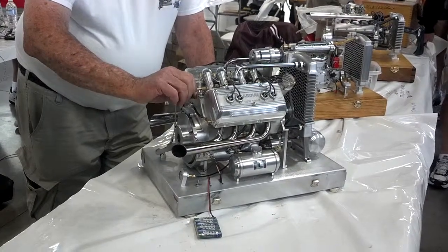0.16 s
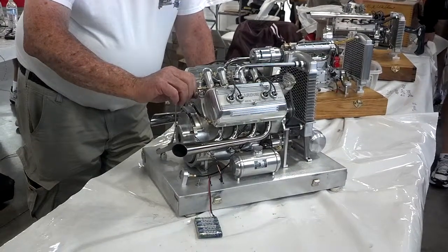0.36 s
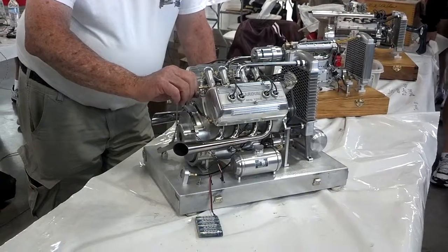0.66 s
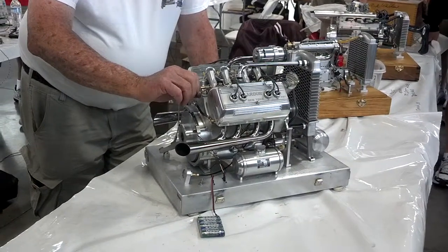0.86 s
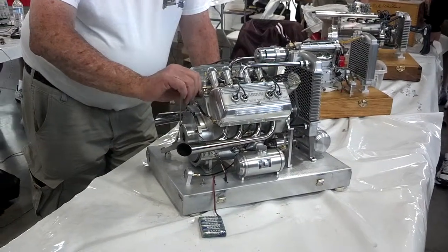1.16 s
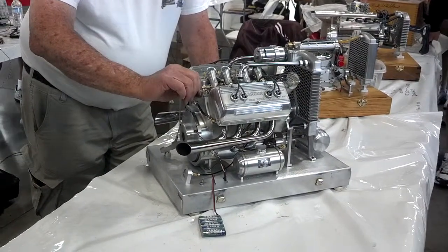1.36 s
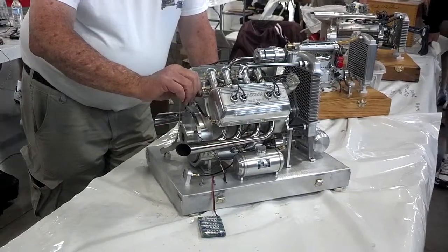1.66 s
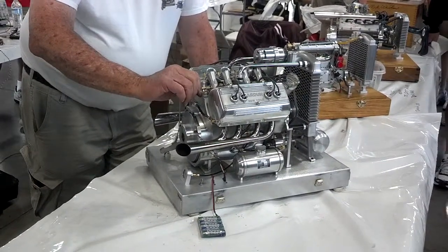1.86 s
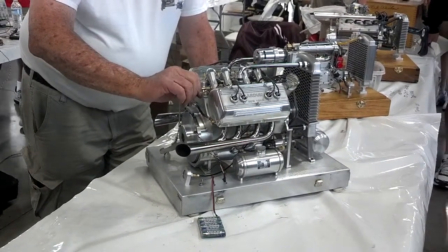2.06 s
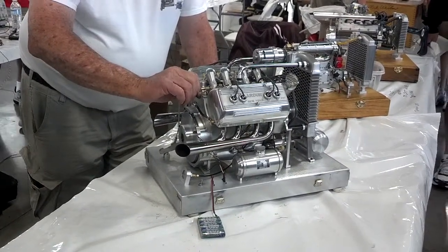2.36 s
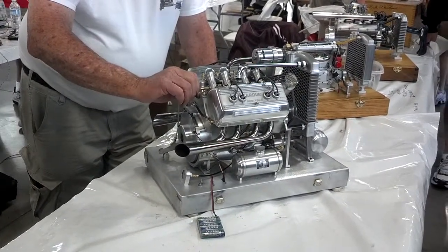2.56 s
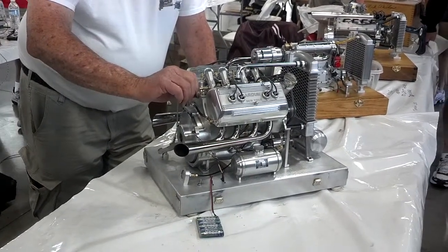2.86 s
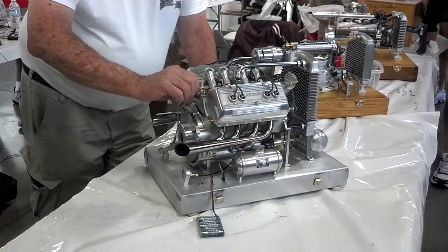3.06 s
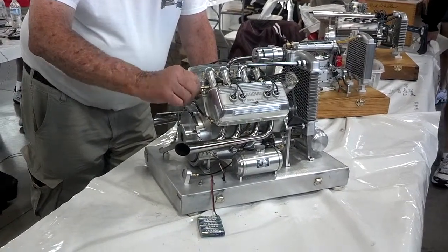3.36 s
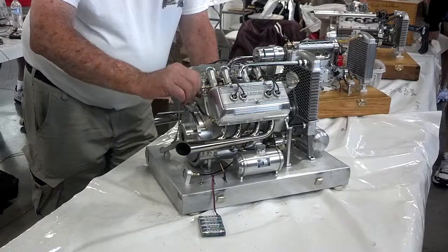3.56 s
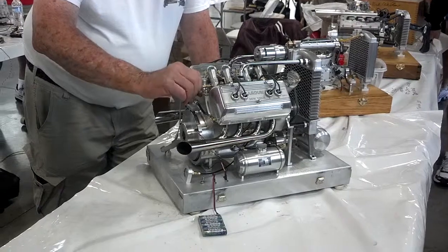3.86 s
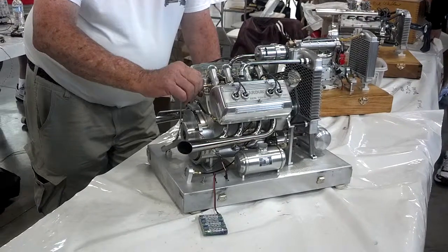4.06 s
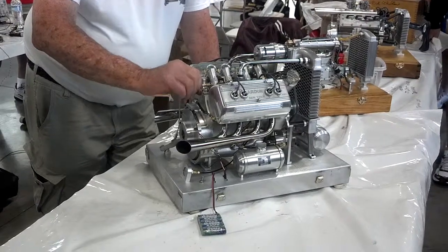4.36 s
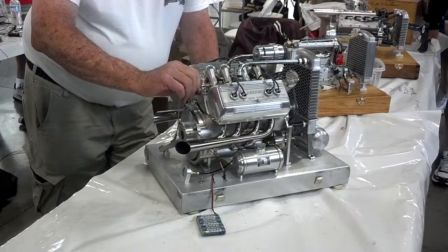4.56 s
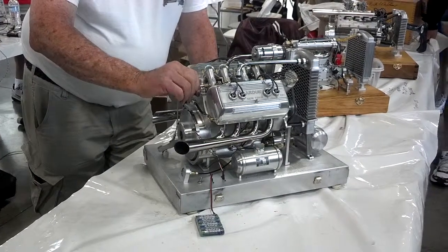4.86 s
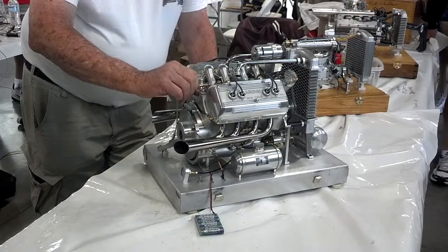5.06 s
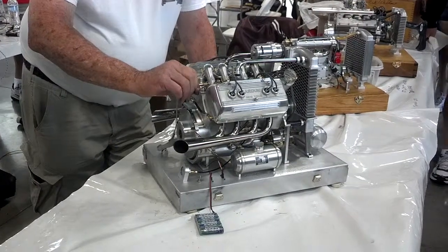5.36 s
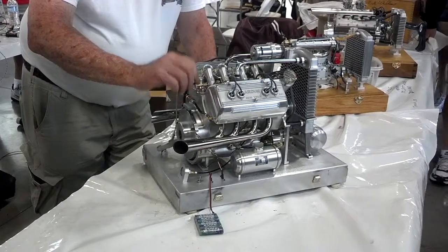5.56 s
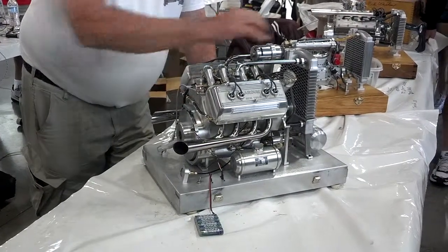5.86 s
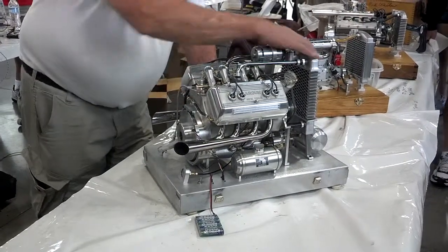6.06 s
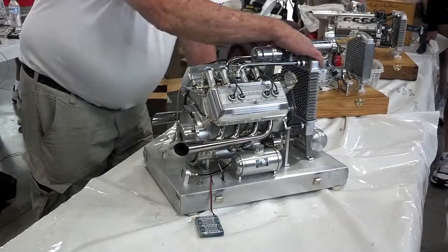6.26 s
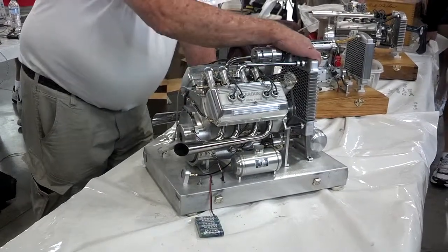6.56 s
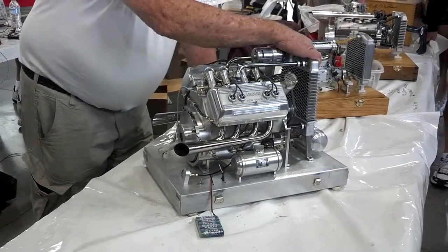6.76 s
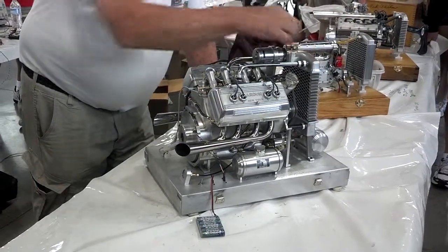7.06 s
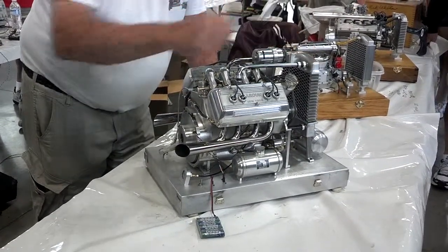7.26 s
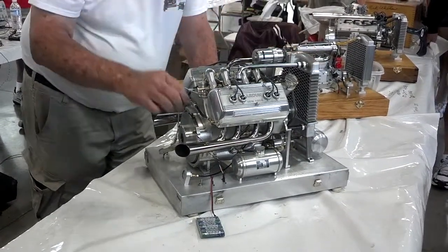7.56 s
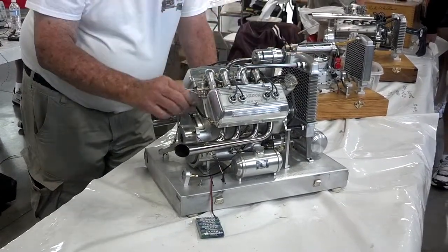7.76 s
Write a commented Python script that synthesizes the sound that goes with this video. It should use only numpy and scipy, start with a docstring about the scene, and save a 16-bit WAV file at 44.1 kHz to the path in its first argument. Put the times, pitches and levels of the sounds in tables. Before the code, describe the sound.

A miniature eight-cylinder engine idles roughly with sharp exhaust pops and is revved in several short blips in a hall.

```python
"""A miniature eight-cylinder engine idles lumpily on a table in a hall and is revved in short blips.
Each firing sends a pressure pulse into the exhaust pipes, which resonate with a thump, and releases a
turbulent jet whose crack sets the metal headers ticking. At speed the firings also sound as a drone.
Valve gear and fan whirr underneath, and the hall reverberates. The sound is wide and hollow in
stereo, the right channel inverted and a little late."""
import sys
import numpy as np
from scipy import signal
from scipy.fft import rfft, irfft, next_fast_len
from scipy.io import wavfile

SR = 44100
rng = np.random.default_rng(int(sys.argv[2]) if len(sys.argv) > 2 else 0)


def master_out(mix):
    """Clip the mix to full scale and print it as 16-bit PCM to the path in sys.argv[1]."""
    frames = np.transpose(np.atleast_2d(mix))
    ceiling = np.clip(frames, -1, 1)
    pcm = np.round(ceiling * 32767).astype(np.int16)
    wavfile.write(sys.argv[1], SR, pcm)


N = 349272


def engine(first_cylinder_s=6.976):
    """Superposition: the sources that one crankshaft drives add, in a sum and a difference view."""
    time = np.arange(N) / SR
    rate, opened, rasp_db, thump_db, crack_db = throttle(time)
    stumble_db = stumbles(time)
    phase = np.cumsum(rate) / SR   # one cycle per firing of one bank
    phase = phase - phase[int(first_cylinder_s * SR)]
    thump, crack = firings(phase, rate, opened, thump_db, crack_db, stumble_db)
    running = exhaust_drone(phase, rate, opened, stumble_db) + gear_whirr(rate)
    exhaust = pipe_resonance(blowdown(thump), rasp_db)
    return exhaust + running + jet_cracks(crack) + header_ticks(crack) + gas_puffs(crack)


def throttle(time, sink_per_s=550, shut_s=.0057, charge_lead=2.08):
    """Inertia: the charge follows the throttle quickly, the speed (one bank's firing rate) lags."""
    # speed the engine sinks back to: (time [s], firing rate of one bank [1/s])
    idle_speed = [(.8, 86), (1.4, 78), (1.75, 84), (2.5, 104), (5.9, 104), (6.08, 110.3), (6.5, 110.3),
                  (6.8, 109.3), (7.15, 107.8), (7.92, 107.9)]
    # throttle blips: (opens [s], reaches top speed [s], shuts [s], top rate of one bank [1/s],
    # thump level [dB], crack level [dB], starved afterwards [s])
    blips = [(-.5, -.1, .6, 128, -22.5, -21, .35), (1.72, 2.2, 2.41, 138, -26, -22, 0.093),
             (2.56, 2.943, 3.265, 217, -20.5, -19, 0.036), (3.32, 3.72, 4.06, 217.5, -21.5, -19.5, 0.4),
             (4.401, 4.731, 4.85, 188, -22, -18.5, 0.13)]
    idle_thump_db, idle_crack_db, idle_rasp_db, open_rasp_db = -29.5, -31.5, 1, 7.5
    thump_sag_db_per_s, rasp_sag_db_per_s = 1.5, 3
    idle = np.interp(time, *np.transpose(idle_speed))
    rate, opened, starved = idle, 0, 0
    rasp_db, thump_db, crack_db = idle_rasp_db, idle_thump_db, idle_crack_db
    for opens, full, shuts, top, top_thump_db, top_crack_db, starved_s in blips:
        rise, shut = ramp(time, opens, full), ramp(time, shuts, shuts + shut_s)
        rate = np.maximum(rate, idle + rise * (top - idle) - sink_per_s * np.maximum(time - shuts, 0))
        charge = np.minimum(charge_lead * rise, 1) * (1 - shut)
        held_s = np.maximum(time - max(full, 0), 0)
        opened += charge
        starved += shut * (1 - ramp(time, shuts, shuts + starved_s) ** 3)
        rasp_db += charge * (open_rasp_db - idle_rasp_db - rasp_sag_db_per_s * held_s)
        thump_db += charge * (top_thump_db - idle_thump_db - thump_sag_db_per_s * held_s)
        crack_db += charge * (top_crack_db - idle_crack_db)
    # starved firings thump 1 dB more and crack 6 dB less
    return rate, opened, rasp_db, thump_db + starved, crack_db - 6 * starved


def stumbles(time):
    """Partial misfire: under throttle the mixture stumbles and a few firings lose level, in dB."""
    # weak spells: (time [s], duration [s], loss [dB])
    spells = [(0.111, 0.022, 11), (0.229, 0.02, 12), (0.295, 0.018, 14), (0.419, 0.02, 10),
              (0.547, 0.02, 11.5), (1.864, 0.026, 5.5), (1.945, 0.018, 4), (2.04, 0.012, 6),
              (2.212, 0.018, 11), (2.291, 0.025, 18), (2.599, 0.0087, 12), (2.686, .025, 12),
              (2.741, 0.011, 19), (2.792, 0.0092, 13), (2.886, 0.0099, 13), (2.943, 0.017, 6.5),
              (3.141, 0.012, 12), (3.469, 0.026, 6), (3.51, 0.013, 12), (3.558, 0.012, 7.5),
              (4.553, 0.015, 10.5), (4.602, 0.018, 21), (4.653, 0.011, 17), (4.698, 0.012, 19),
              (4.744, 0.013, 6), (4.796, 0.012, 13)]
    return sum(db * (ramp(time, start - .003, start) - ramp(time, start + span - .002, start + span))
               for start, span, db in spells)


def firings(phase, rate, opened, thump_db, crack_db, stumble_db):
    """Cyclic variation: uneven combustion scatters the thump and crack impulses in level and time."""
    # habitual strength of each cylinder, in firing order: (level [dB])
    cylinder_db = [4.5, -4.5, -10, -0.5, -1.5, -3, -1, -8.5]
    # hard firings: (time [s], crack level [dB], thump level before the full-charge limit [dB])
    pops = [(0.055, -18, -15), (0.165, -19, -12), (0.2728, -11.5, -11.5), (0.3161, -14.5, -11),
            (0.3755, -15, -15), (0.439, -14, -9.5), (0.47, -18, -12), (0.49, -22, -12.5),
            (0.595, -21, -13.5), (0.751, -13.5, -22.5), (0.8624, -18, -19.5), (0.8975, -14.5, -22),
            (0.9238, -29, -16.5), (0.9447, -20, -21), (0.9741, -15.5, -17), (1.0108, -11.5, -32),
            (1.036, -13.5, -23.5), (1.094, -16.5, -19), (1.1282, -17, -19.5), (1.1499, -16, -24),
            (1.1786, -19, -20), (1.2051, -16, -15.5), (1.238, -12.5, -19), (1.321, -13.5, -17),
            (1.3314, -14.5, -21.5), (1.3709, -17.5, -22), (1.4019, -12, -23), (1.475, -18, -17),
            (1.508, -11.5, -10), (1.525, -14.5, -17.5), (1.548, -21, -15), (1.5765, -16, -21),
            (1.6078, -15, -9), (1.625, -16, -13), (1.6754, -15.5, -19.5), (1.707, -12, -10),
            (1.738, -12.5, -17), (1.8149, -13.5, -13.5), (1.8894, -15, -11), (1.98, -11, -17),
            (2.0783, -17, -12), (2.1482, -17, -9), (2.2365, -14, -11), (2.3262, -37, -15.5),
            (2.3839, -15, -12), (2.4818, -14, -15.5), (2.5259, -30, -21.5), (2.5578, -14.5, -18),
            (2.6238, -14, -15), (2.7036, -15, -11), (3.158, -29, -12), (3.2441, -17, -14.5),
            (3.317, -25, -16), (3.3587, -15, -17.5), (3.3949, -13, -11), (3.4268, -13.5, -12),
            (3.448, -15, -20), (3.491, -11.5, -18), (3.5434, -14, -23), (3.8228, -26, -11),
            (4.2892, -18, -18), (4.3241, -11.5, -19.5), (4.342, -14.5, -19.5), (4.3873, -17, -17),
            (4.3977, -14.5, -18), (4.427, -17, -19.5), (4.454, -13, -26), (4.5107, -11.5, -21),
            (4.6244, -11.5, -15), (4.685, -14, -13), (4.8179, -28, -13), (5.032, -16, -17.5),
            (5.0965, -14, -14), (5.11, -13.5, -12), (5.137, -23, -28), (5.1851, -13.5, -15),
            (5.2094, -15, -16), (5.2644, -13.5, -11.5), (5.2757, -17.5, -21.5), (5.327, -13, -15.5),
            (5.3416, -14, -19), (5.421, -13.5, -16.5), (5.43, -17, -28), (5.4582, -12, -14),
            (5.4807, -15.5, -18), (5.5336, -13, -13.5), (5.5845, -13.5, -12.5), (5.598, -17, -23),
            (5.6114, -16.5, -13), (5.685, -15, -11), (5.7253, -14, -11), (5.733, -15, -26),
            (5.7481, -14, -23), (5.76, -14.5, -10), (5.817, -22, -17), (5.8371, -12.5, -14),
            (5.8862, -14, -26), (5.9009, -13, -18), (5.9146, -16, -14), (5.934, -18, -25),
            (5.9956, -11, -20), (6.004, -18, -26), (6.018, -16, -11), (6.0309, -11, -12), (6.074, -16, -19),
            (6.1024, -14.5, -13.5), (6.1476, -19.5, -29), (6.1616, -10.5, -12.5), (6.174, -16, -13),
            (6.22, -19, -25), (6.2472, -18, -18), (6.2694, -13, -13), (6.3197, -18.5, -16),
            (6.369, -17, -17.5), (6.382, -12, -16), (6.396, -19, -17), (6.467, -13.5, -18.5),
            (6.475, -13, -20), (6.485, -15, -19), (6.501, -17.5, -15), (6.5762, -18, -14),
            (6.584, -13, -28), (6.61, -16, -13.5), (6.6701, -11.5, -11), (6.685, -16, -17),
            (6.692, -17, -22), (6.701, -16, -18), (6.7576, -15.5, -9), (6.778, -11.5, -21),
            (6.802, -17, -17), (6.83, -18.5, -17.5), (6.8713, -34, -34), (6.8902, -13, -14.5),
            (6.921, -14, -17), (6.9757, -13, -11), (7.023, -17.5, -16), (7.0373, -9.5, -12),
            (7.1246, -13, -17), (7.1462, -16, -16), (7.159, -9, -13), (7.1966, -18, -15), (7.259, -21, -34),
            (7.274, -15, -9), (7.2841, -15.5, -27), (7.309, -12.5, -16), (7.3485, -14.5, -15),
            (7.3884, -18, -13.5), (7.397, -15.5, -21.5), (7.413, -13.5, -12), (7.424, -15.5, -19),
            (7.496, -10, -13), (7.505, -16, -23), (7.519, -18, -16), (7.532, -17, -10), (7.567, -15.5, -16),
            (7.629, -15.5, -16), (7.643, -15.5, -14), (7.6903, -15, -13), (7.718, -14.5, -7),
            (7.7389, -14.5, -17), (7.7911, -14, -10), (7.8386, -13, -18), (7.853, -13, -17),
            (7.867, -20, -20), (7.884, -16.5, -14)]
    pop_s, pop_crack_db, pop_thump_db = np.transpose(pops)
    catch_db, catch_s, full_charge_db = 11.5, .0084, -14
    climbing_delay_s, open_delay_s, idle_delay_s = .0007, .0003, .0012   # spread of the burning delay
    count = np.floor(2 * phase).astype(int)   # the two banks take turns
    at = np.flatnonzero(np.diff(count)) + 1
    cylinder = count[at] % len(cylinder_db)
    strength_luck, crack_luck, delay_luck = np.clip(rng.standard_normal((4000, 3))[:len(at)], -2.5, 1.2).T
    uneven_db = np.maximum(4.5 - 3 * np.log2(rate[at] / 100), 0)   # steadier at speed
    strength_db = np.array(cylinder_db)[cylinder] - stumble_db[at] + uneven_db * strength_luck
    # at a fast idle a hard firing drags the next ones along
    since_pop_s = at / SR - np.append(-9, pop_s)[np.searchsorted(pop_s, at / SR)]
    fast_idle = (1 - opened[at]) * ramp(rate[at], 85, 104)
    strength_db += catch_db * fast_idle * np.exp(-(since_pop_s / catch_s) ** 2)
    strength_db = np.minimum(strength_db, 5 + 20 * opened[at])   # low ceiling at idle
    is_open, climbing = opened[at] > 0, np.gradient(rate)[at] > 0
    spread_s = np.select([is_open & climbing, is_open], [climbing_delay_s, open_delay_s], idle_delay_s)
    onset = at + (spread_s * SR * np.abs(delay_luck)).astype(int)
    thumps_db = thump_db[at] + 1.36 * strength_db
    cracks_db = crack_db[at] + strength_db + 3 * crack_luck
    # each hard firing replaces the nearest ordinary one
    nearest = np.abs(at[:, None] - pop_s * SR).argmin(axis=0)
    onset[nearest], thumps_db[nearest], cracks_db[nearest] = pop_s * SR, pop_thump_db, pop_crack_db
    return impulses(onset, np.minimum(thumps_db, full_charge_db)), impulses(onset, cracks_db)


def blowdown(train, wake_db=-26, wake_s=.006, wake_hz=400):
    """Turbulence: each exhaust pulse trails a noisy wake, different in the two views."""
    swirl = signal.lfilter(*signal.butter(1, wake_hz, "high", fs=SR), rng.standard_normal((2, N)))
    return train + from_db(wake_db) * decay(train, wake_s) * swirl


def pipe_resonance(blast, rasp_db, spread_db=1.5):
    """Resonance: parallel modes, each filtered twice so that its ring swells and then dies quickly."""
    # modes of pipes and base: (frequency [Hz], bandwidth [Hz], level [dB], change with rasp [dB/dB])
    modes = [(161, 82, -17, 0.23), (267.7, 122, -1.5, -0.36), (356.4, 128.5, 2, -0.22),
             (419, 80, 0.5, -0.27), (598, 155, -13, 1.77), (717, 83, -26.5, 1.45), (1024, 380, -2, 0.64),
             (1219, 240, -19, 1.64), (1497, 240, -34, 3.5), (1920, 182, -19.5, 1.67),
             (2351, 137, -17, 0.76), (440.8, 54.4, -14.5, 2.29)]
    out = 0
    for k, (hz, width_hz, db, rasp_share) in enumerate(modes):
        radius, angle = np.exp(-np.pi * width_hz / SR), 2 * np.pi * hz / SR
        poles = [1, -2 * radius * np.cos(angle), radius ** 2]
        drive = blast * from_db(spread_db * waver(60))
        band = signal.lfilter([1 - radius ** 2, 0, radius ** 2 - 1], poles, drive)
        ring = signal.lfilter([0, np.sin(angle)], poles, band)
        out += (-1) ** k * from_db(db + rasp_db * rasp_share) * ring
    return out


def jet_cracks(train, correlation=.26, spread_db=3.5):
    """Jet noise: each firing gates a quick spit and a weaker tail, with its own balance of bands."""
    # spectrum of the gas jet: (frequency [Hz], relative spectral density [dB])
    spectrum = [(300, 6), (1200, 6.5), (2300, 6), (2600, 11), (3000, 5.5), (3900, -1), (5000, 8), (6400, 1),
                (7600, 2.5), (8400, 1), (11000, 2.5), (13500, -3), (15300, 9.5), (16500, -24)]
    rise_s, fall_s, tail_s, tail_db = .0011, .0021, .0085, -19.5
    jet = coloured_noise(spectrum)
    second_view = correlation * jet + np.sqrt(1 - correlation ** 2) * coloured_noise(spectrum)
    rest = np.array([jet, second_view])
    out = 0
    for edge_hz in (1500, 2730, 4100, 5500, 8500, None):
        band = signal.lfilter(*signal.butter(2, edge_hz, fs=SR), rest) if edge_hz else rest
        rest = rest - band
        spit = train * from_db(spread_db * np.clip(rng.standard_normal(N), -2, 2))
        tail = from_db(tail_db) * decay(spit, tail_s)
        out += band * (decay(spit, fall_s) - decay(spit, rise_s) + tail)
    return out


def exhaust_drone(phase, rate, opened, stumble_db, pipe_hz=432):
    """Forced vibration: engine orders, loudest when the rate of all firings meets the pipe's pitch."""
    # exhaust partials: (frequency [multiple of one bank's firing rate], relative level [dB])
    orders = [(.75, -23), (1.25, -13), (1.75, -13), (2, 0), (2.25, -14), (2.75, -15), (3.25, -18)]
    peak_db, fall_db_per_octave, coast_db = -11.5, 55, -29
    tuned_db = peak_db - fall_db_per_octave * np.abs(np.log2(2 * rate / pipe_hz))
    driven = opened * from_db(tuned_db - stumble_db / 2)
    coasting = (np.gradient(rate) < 0) * ramp(rate, 106, 135) * from_db(coast_db)
    envelope = (driven + coasting) * from_db(waver(25))
    return envelope * sum(from_db(db) * np.sin(2 * np.pi * order * phase + .18 * waver(20))
                          for order, db in orders)


def header_ticks(train, spread_db=4.5):
    """Free vibration: each crack rings the damped metal modes of the headers in a different mix."""
    # header modes: (frequency [Hz], level [dB], time to decay by 60 dB [s])
    modes = [(1934, -15.5, 0.042), (3317, -15, 0.027), (4900, -26.5, 0.0049), (5215, -9.5, 0.015),
             (6645, -11, 0.0094), (7820, -9.5, 0.011)]
    out = 0
    for hz, db, t60 in modes:
        radius, angle = from_db(-60 / (t60 * SR)), 2 * np.pi * hz / SR
        poles = [1, -2 * radius * np.cos(angle), radius ** 2]
        struck = train * from_db(db + spread_db * np.clip(rng.standard_normal(N), -2, 1.5))
        out += signal.lfilter([0, np.sin(angle)], poles, struck + 1e-18)
    return out


def gas_puffs(train, puff_hz=120):
    """Pressure pulse: each crack brings a dull, uneven push of gas, in the difference view only."""
    push = train * from_db(1 + 6 * np.clip(rng.standard_normal(N), -2, 1.5))
    band = signal.butter(2, [.7 * puff_hz, 1.5 * puff_hz], "band", fs=SR, output="sos")
    puff = SR / puff_hz / 10 * signal.sosfilt(band, push + 1e-18)
    return np.array([np.zeros(N), puff])


def gear_whirr(rate, level_db=-32, db_per_octave=11.5):
    """Broadband machine noise: valve gear and fan grow louder as a power of the speed."""
    # spectrum of valve gear and fan: (frequency [Hz], relative spectral density [dB])
    spectrum = [(40, -57), (150, -6.5), (400, 1.5), (1000, -7), (2500, -22.5), (6000, -34.5), (11000, -56),
                (16000, -36)]
    return from_db(level_db + db_per_octave * np.log2(rate / 100)) * coloured_noise(spectrum)


def hall(x, bass_t60_s=.45, wall_cut_hz=930):
    """Reverberation: six echo loops per view, duller on every round as the walls absorb treble."""
    size = next_fast_len(N + SR)
    omega = 2 * np.pi * np.arange(size // 2 + 1) / size
    wall = 1 / (1 + 1j * omega * SR / (2 * np.pi * wall_cut_hz))
    response = np.zeros((2, len(omega)), complex)
    for k, lag in enumerate(rng.uniform(.0066, .045, 12) * SR):
        loop = from_db(-60 * lag / SR / bass_t60_s) * wall * np.exp(-1j * omega * lag)
        response[k % 2] += (-1) ** (k // 2) * loop / (1 - loop)
    return irfft(response * rfft(x, size), size)[:, :N]


def from_db(db):
    """Amplitude ratio of a level."""
    return 10 ** (np.asarray(db) / 20)


def ramp(x, start, end):
    """Linear rise from 0 to 1 between two values of x."""
    return np.clip((x - start) / (end - start), 0, 1)


def waver(per_s):
    """Random modulation: straight lines between per_s normal draws a second."""
    return np.interp(np.arange(N) / SR * per_s, np.arange(1000), rng.standard_normal(1000))


def impulses(at, db):
    """Impulse train with the given sample positions and levels."""
    train = np.zeros(N)
    np.add.at(train, np.minimum(at, N - 1), from_db(db))
    return train


def decay(train, seconds):
    """Exponential decay after every impulse, with the given time constant."""
    return signal.lfilter([1], [1, -np.exp(-1 / (seconds * SR))], train + 1e-18)


def gain_curve(points, size):
    """Magnitude response on an FFT grid, with levels interpolated over log frequency."""
    hz, db = np.transpose(points)
    return from_db(np.interp(np.log(np.arange(size // 2 + 1) * SR / size + 1), np.log(hz), db))


def coloured_noise(spectrum):
    """Spectral shaping of white noise, scaled to rms 1."""
    noise = irfft(rfft(rng.standard_normal(N)) * gain_curve(spectrum, N), N)
    return noise / np.sqrt(np.mean(noise ** 2) + 1e-20)


def equalise(x, points, size=8192):
    """Minimum-phase filter: folding the cepstrum makes the response causal."""
    cepstrum = irfft(np.log(gain_curve(points, size)))
    cepstrum[1:size // 2] *= 2
    cepstrum[size // 2 + 1:] = 0
    return signal.fftconvolve(x, irfft(np.exp(rfft(cepstrum))))[:N]


def scene(hall_db=-15.5):
    """Direct and reverberant fields add, in one view each for the sum and difference channels."""
    direct = engine()
    return direct + from_db(hall_db) * hall(direct[0])


def record(dry, right_lag_samples=16, right_db=.1, low_cut_hz=60, high_cut_hz=15700):
    """Mid-side matrix, the right inverted and late, followed by soft saturation and band limiting."""
    # colour of the sum channel, a bass lift and two hollows: (frequency [Hz], gain [dB])
    sum_response = [(25, -39), (60, 15.5), (125, 15.5), (250, 15.5), (450, 7), (600, 1), (700, 2),
                    (790, -3.5), (870, 3), (1090, -.5), (1160, -8), (1220, 1)]
    late = np.pad(dry, [(0, 0), (right_lag_samples, 0)])[:, :N]
    mid = equalise(dry[0] - late[0], sum_response) / 2
    side = (dry[1] + late[1]) / 2
    stereo = np.array([mid + side, from_db(right_db) * (mid - side)])
    rounded = 1.064 * np.tanh(stereo / 1.213)
    thinned = signal.sosfilt(signal.butter(2, low_cut_hz, "high", fs=SR, output="sos"), rounded)
    return signal.sosfilt(signal.cheby1(12, 1, high_cut_hz, fs=SR, output="sos"), thinned)


dry = scene()
out = record(dry)
master_out(out)
```